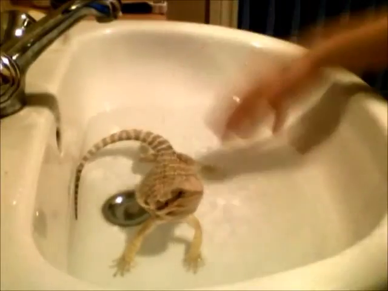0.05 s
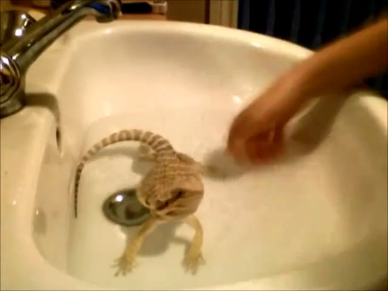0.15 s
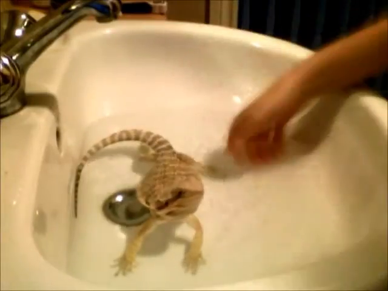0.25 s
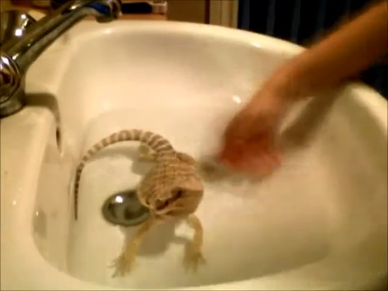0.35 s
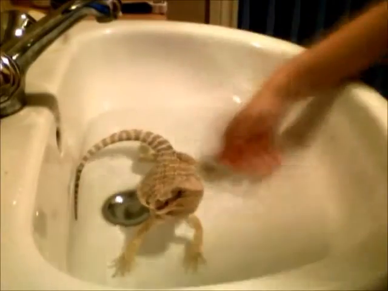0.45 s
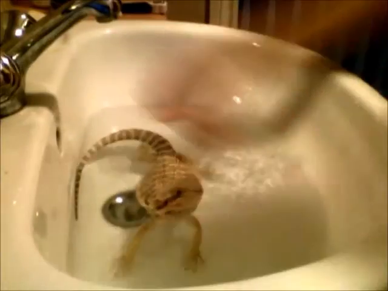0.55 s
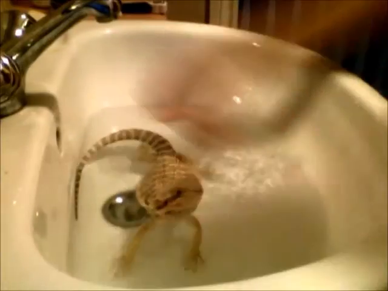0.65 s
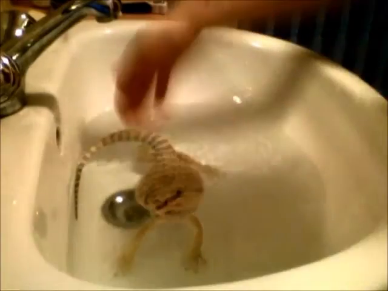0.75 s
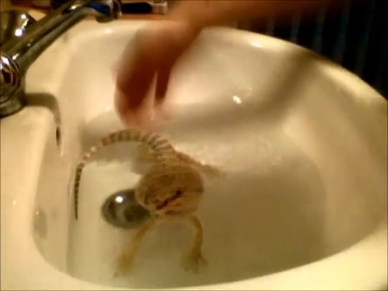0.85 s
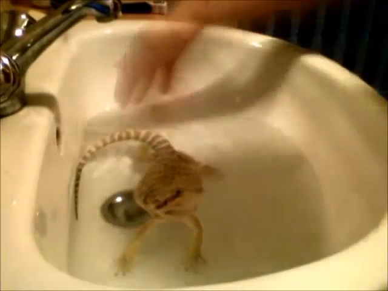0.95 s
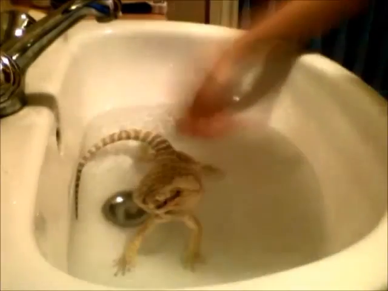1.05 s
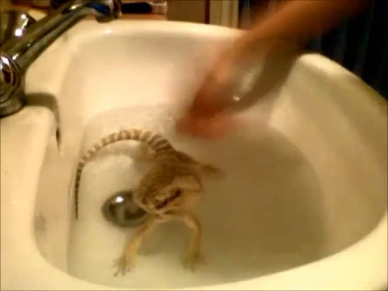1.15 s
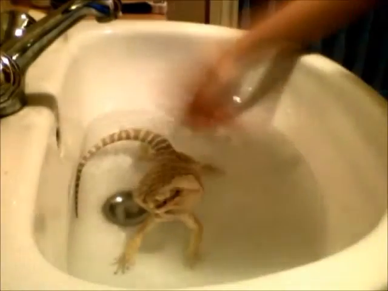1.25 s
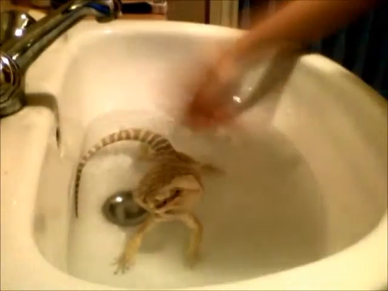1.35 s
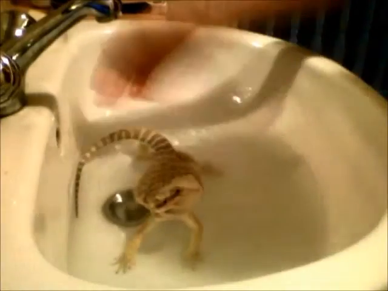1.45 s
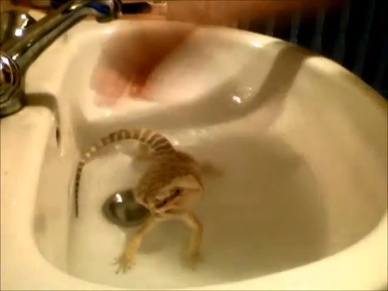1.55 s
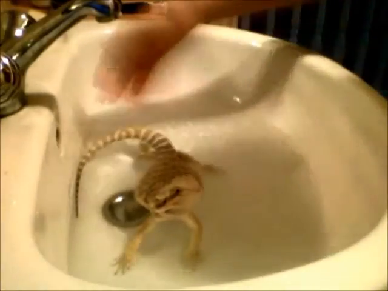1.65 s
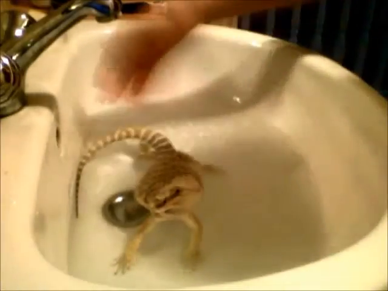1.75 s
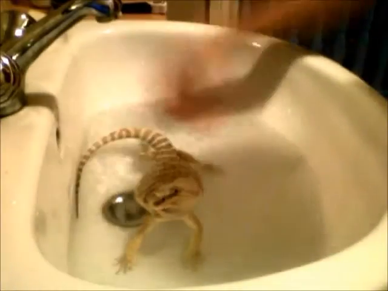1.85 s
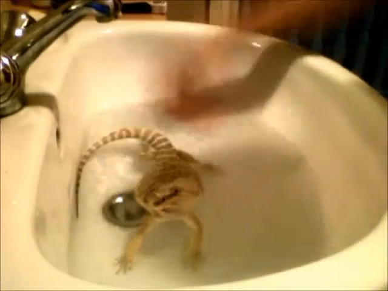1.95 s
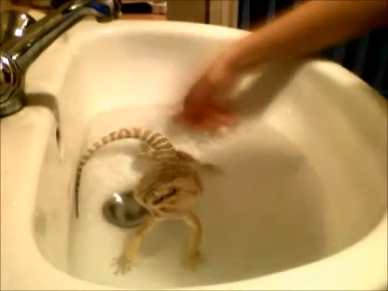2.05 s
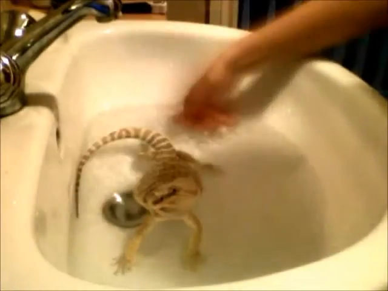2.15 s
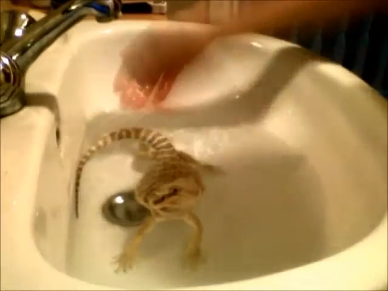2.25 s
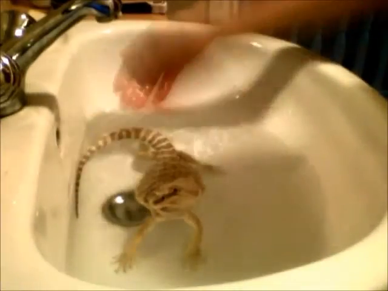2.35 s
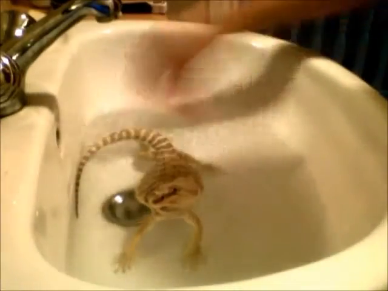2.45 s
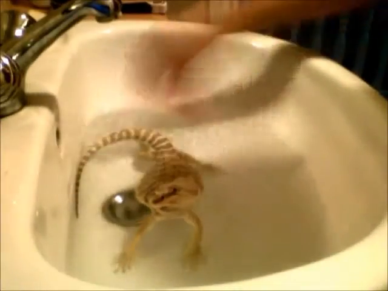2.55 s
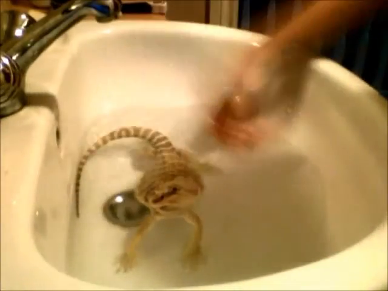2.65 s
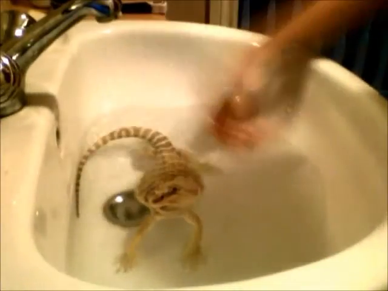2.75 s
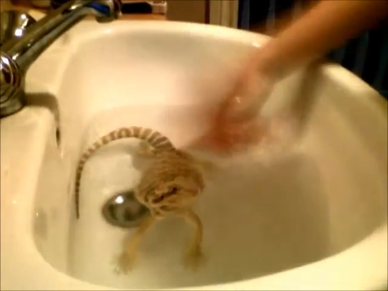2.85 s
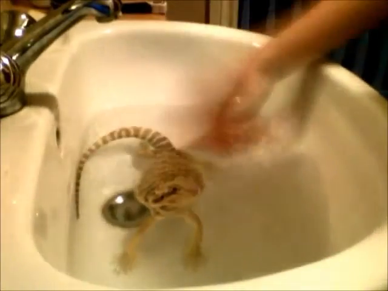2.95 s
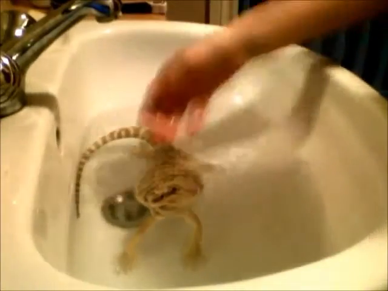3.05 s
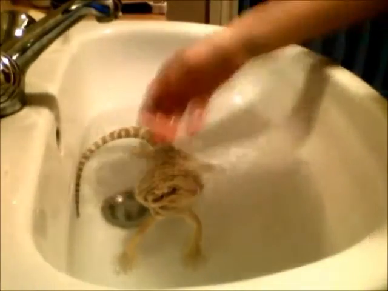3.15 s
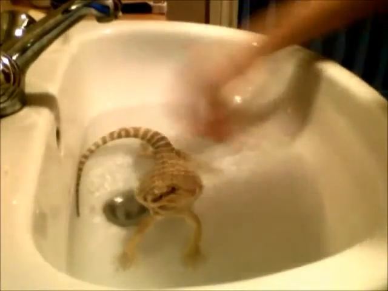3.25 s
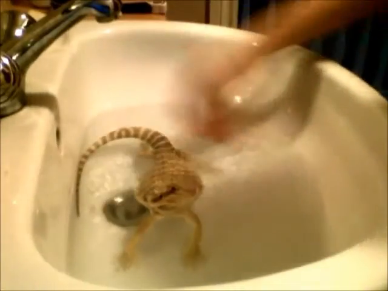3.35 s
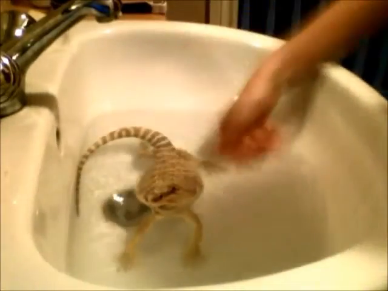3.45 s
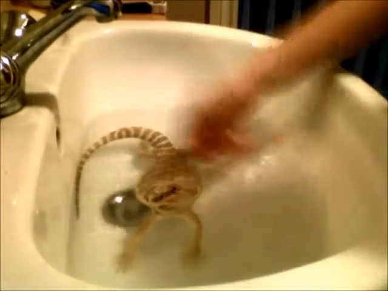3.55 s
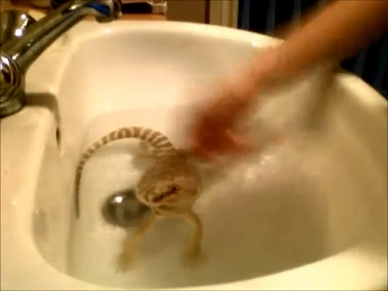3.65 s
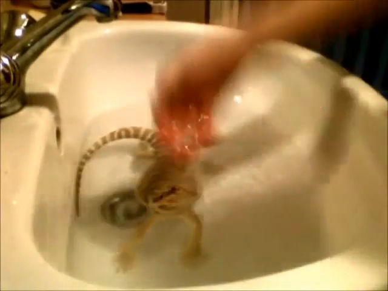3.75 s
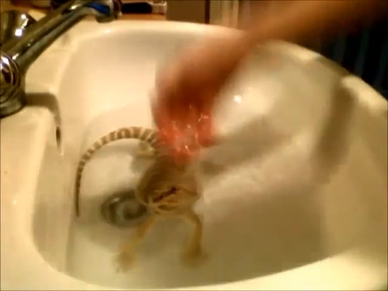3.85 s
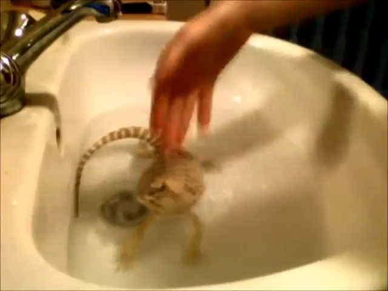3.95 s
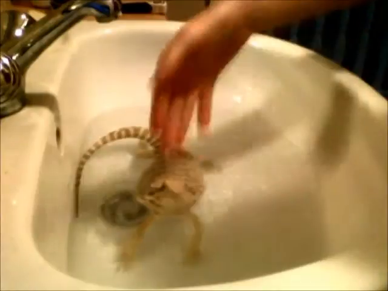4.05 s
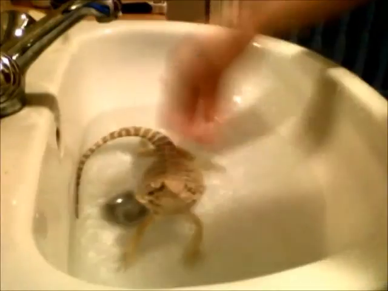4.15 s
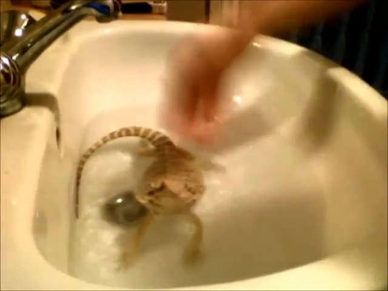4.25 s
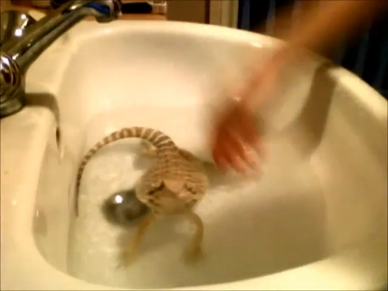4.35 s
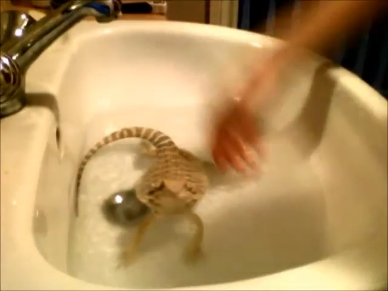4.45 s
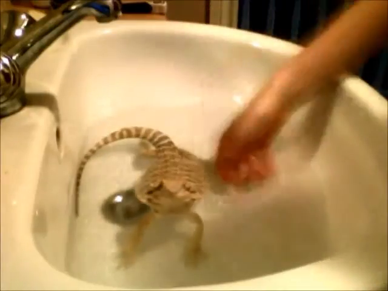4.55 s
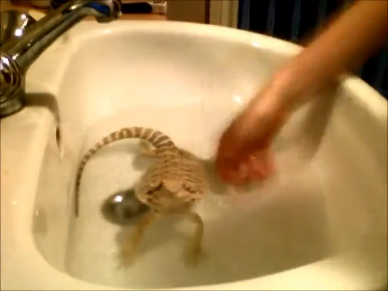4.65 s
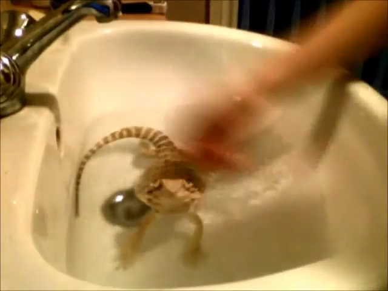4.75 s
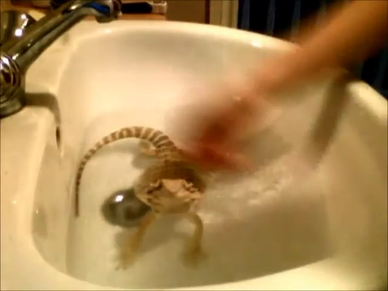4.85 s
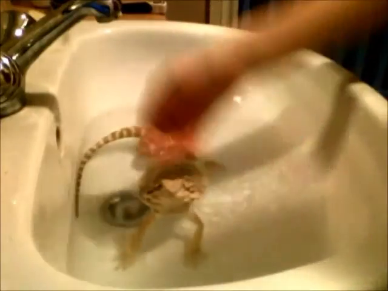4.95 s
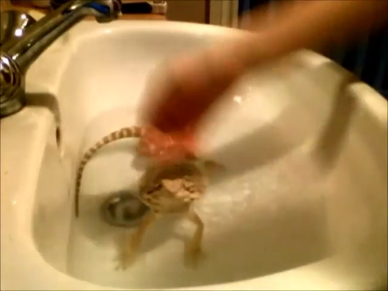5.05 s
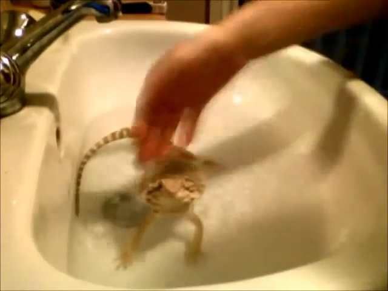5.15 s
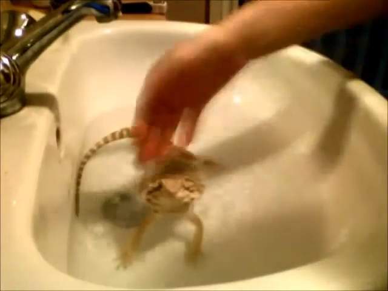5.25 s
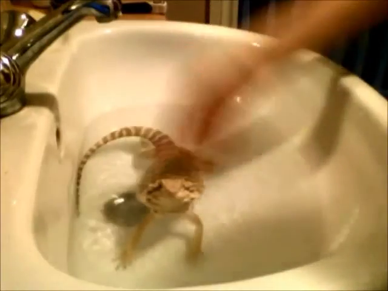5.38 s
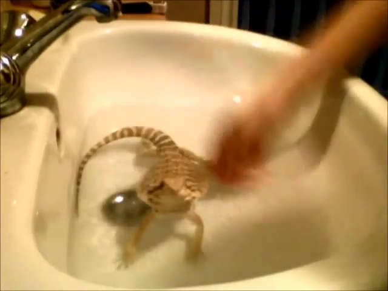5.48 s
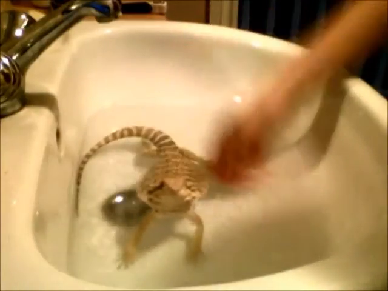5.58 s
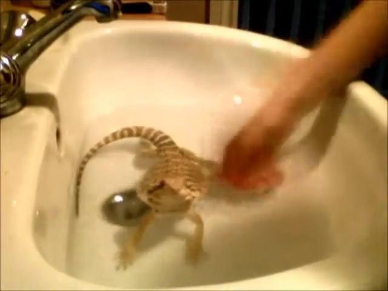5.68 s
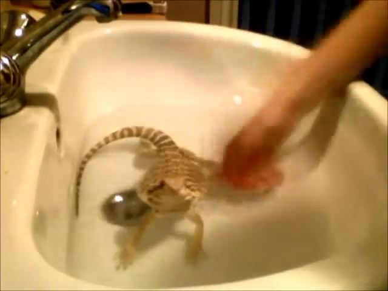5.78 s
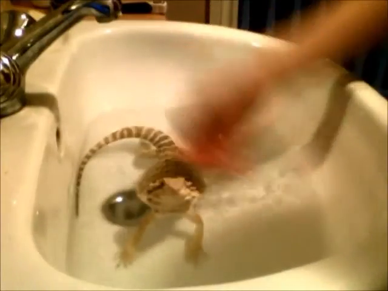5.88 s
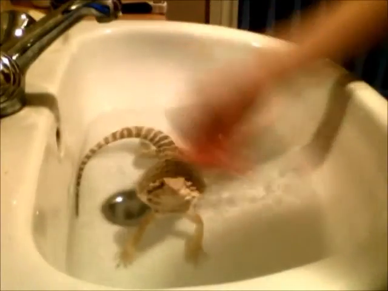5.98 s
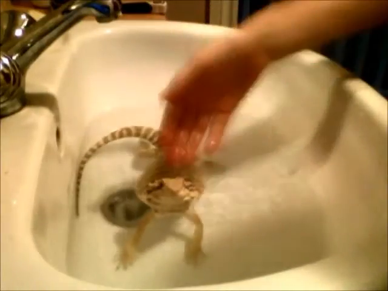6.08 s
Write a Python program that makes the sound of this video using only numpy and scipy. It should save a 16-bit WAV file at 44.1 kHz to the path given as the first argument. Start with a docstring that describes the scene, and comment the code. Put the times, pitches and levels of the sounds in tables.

```python
"""A tiled bathroom: a hand scoops water over a lizard in a shallow sink, heard by a small camera on the counter.
Single drops plink as pitched bubbles, and stirred water fizzes as clouds of bubbles; both ring in the room.
Bumps against the basin arrive through the counter as dull, rebounding thumps.
An extractor fan whirs with shaft-locked tones, motor hum and rushing air.
The microphone passes a narrow band and mirrors some of the treble above it."""
import sys
import numpy as np
from scipy import signal
from scipy.fft import rfft, irfft, next_fast_len
from scipy.io import wavfile
from scipy.ndimage import map_coordinates

SR = 44100
rng = np.random.default_rng(int(sys.argv[2]) if len(sys.argv) > 2 else 0)


def put_to_file(sound):
    """Save the sound as 16-bit audio at rate SR, in the file named by the first command-line argument."""
    columns = np.atleast_2d(sound).T  # one column per channel
    safe = np.clip(columns, -1, 1)
    whole_steps = np.round(safe * 32767)
    wavfile.write(sys.argv[1], SR, whole_steps.astype(np.int16))


N = 269892

# Fan tones before a common trim: [multiple of the shaft speed, rms level/dB]
FAN_TONES = [(1, -61.5), (3, -74), (4, -69), (5, -75), (6, -62), (7, -72.5), (8, -57), (12, -61),
             (14, -71.5), (16, -67.5), (17, -77), (18, -61), (20, -70), (22, -76.5), (24, -79.5), (26, -76)]
# Spectrum of the air through the fan: [f/Hz, relative density/dB]
AIR_SPECTRUM = [(12, -3.5), (25, -1), (45, -10), (100, -12), (200, -16), (350, -22.5), (800, -20.5),
                (1300, -22.5), (1800, -24.5), (2300, -30), (2700, -30.5), (3300, -40), (4000, -47),
                (5000, -65)]
# Slow drift of the fan's blade tone: [t/s, f/Hz]
BLADE_TONE = [(0.1, 799.4), (2.22, 795.6), (3.48, 802.6), (4.45, 804.4), (6.0, 795.5)]
BLADES = 12
# Likeness of left and right in the fan's air: [f/Hz, likeness 0 to 1]
STEREO_LIKENESS = [(1000, 1), (2000, 0.98), (4000, 0.93), (8000, .6)]

# Resonances of counter and camera stand: [f/Hz, relative level/dB, t60/s]
COUNTER_MODES = [(124.6, -7, 0.19), (141.7, 1, 0.2), (208.8, -15.5, 0.23), (275, -18, 0.21)]
# Spectrum of the cabinet's dense shudder: [f/Hz, relative density/dB]
SHUDDER_SPECTRUM = [(15, -7.5), (40, -3), (90, -1.5), (150, 0), (185, -18.5), (210, -5), (245, -16),
                    (277, -12), (310, -17), (400, -17.5), (600, -33.5), (1200, -46), (3000, -78.5)]
# Bumps on the basin: [t/s, ring level/dB, sway level/dB, sway f/Hz, wait to first rebound/s,
# ring loss per rebound/dB, sway loss per rebound/dB]
BUMPS = [(0.05, -14.5, -36, 34.9, .068, 16.5, 1), (0.811, -48, -42, 61, .04, 10.5, 10),
         (1.279, -33.5, -19, 22, 0.034, 2, 3.5), (1.861, -33, -31, 27.9, 0.054, 17, 19),
         (2.13, -54.5, -38.5, 27.2, 0.058, 10, 9), (2.68, -54, -44.5, 70, 0.054, 7.5, 4),
         (3.289, -51, -37, 22, 0.057, 10, 8), (3.684, -41, -20.5, 24, 0.028, 2.4, 6.5),
         (4.1856, -11, -14.5, 70.9, .022, 6, 1.5), (4.602, -22, -21.5, 51.4, .026, 4, -0.1),
         (5.098, -12.5, -17.5, 29, .038, 10, 9), (5.188, -26, -23, 24, .03, 9, 12),
         (5.672, -36, -12, 32, 0.048, 0, 4.5)]
# Factors from one rebound to the next
WAIT_GROWS, SWAY_SLOWS = 1.15, .9
# The hand leans on the basin before a bump: length, and level against the sway
LEAN_S, LEAN_DB = 0.025, -18.5
# The camera stand rocks on: pitch, its scatter, level against the sway, decay, build-up
STAND_HZ, STAND_OCTAVES, STAND_DB, STAND_T60_S, STAND_RISE_S = 28, .5, -12.5, 0.87, 0.099

# Single drops: [t/s, settled bubble f/Hz, nominal peak level/dB]
DROPS = [(0.335, 1910, -54.5), (0.559, 1650, -49), (1.2, 2080, -53), (2.07, 2590, -57), (2.745, 2620, -49),
         (3.8824, 1840, -29), (3.939, 2420, -51), (4.974, 2630, -54), (5.015, 1980, -47),
         (5.668, 2060, -45.5), (5.688, 2635, -47.5), (5.739, 2770, -49.5)]
# A louder drop starts further above its pitch: excess as a share at full scale, and its dB per dB of level
PITCH_EXCESS, EXCESS_SLOPE = 2.1, .52
# The hand sweeps through the water: [t/s, length/s, bubble f/Hz, spread/octaves, rms level/dB, spray rms level/dB]
SWEEPS = [(0.754, .078, 239, .26, -56.5, -66), (1.099, 0.065, 534, 0.59, -53.5, -54.5),
          (1.8, .09, 230, .25, -58, -62.5), (5.652, .135, 890, .29, -51, -59.5)]
# Spray pitch over the sweep's pitch; cycles a bubble rings (to -60 dB) in churned water
SPRAY_RATIO, SWEEP_CYCLES = 2.59, 10.5
# Water sloshing in the bowl shortly after a bump: [t/s, rms level/dB]
SLOSHES = [(4.27, -55), (5.17, -58), (5.72, -55.5)]
SLOSH_S, SLOSH_HZ, SLOSH_OCTAVES, SLOSH_CYCLES = .14, 812, 0.026, 40
# Dribbles from the fingers: [t/s, length/s, bubble f/Hz, rms level/dB]
DRIBBLES = [(0.13, .1, 1880, -64), (0.484, .05, 3400, -72.5), (0.687, 0.029, 2890, -61.5),
            (2.077, 0.083, 2450, -69), (2.313, .093, 2800, -68), (2.621, .14, 2040, -68),
            (2.735, .045, 2640, -63), (3.132, .055, 2180, -63.5), (5.009, .067, 2040, -66),
            (5.295, .1, 2750, -67.5)]
DRIBBLE_OCTAVES, DRIBBLE_CYCLES = .09, 28

# Reverberation of the tiled room: [f/Hz, t60/s]
ROOM_DECAY = [(200, 0.66), (2000, 0.37), (5000, 0.06)]
# The microphone's band edge: [f/Hz, gain/dB]
BAND_EDGE = [(3400, -1), (4000, -1.5), (4600, -10), (6000, -32.5)]
# What the microphone's smoothing lets through of the mirrored sound: [f/Hz, gain/dB]
MIRROR_GAIN = [(3400, -15.5), (4000, -5), (4600, -12), (5300, -35.5), (6100, -52.5), (7000, -54.5),
               (8000, -64), (9000, -69.5), (12000, -80.5)]
TOP_HZ = 15400


def amp(db):
    """Decibels to gain."""
    return 10 ** (np.asarray(db) / 20)


def unit(x):
    """Scale to rms 1."""
    return x / np.sqrt(np.mean(x ** 2) + 1e-20)


def along(points, hz):
    """Read a curve of (f/Hz, value) points on a log frequency axis."""
    f, value = np.transpose(points)
    return np.interp(np.log(hz + 1), np.log(f + 1), value)


def wobble(rate):
    """A smooth random curve with `rate` knots a second."""
    knots = rng.standard_normal(int(N * rate / SR) + 4)
    return map_coordinates(knots, [np.arange(N) * rate / SR])


def filtered(x, response):
    """Shape the spectrum of x by a gain that depends on frequency."""
    size = next_fast_len(N + SR // 2)
    gain = response(np.fft.rfftfreq(size, 1 / SR))
    return irfft(rfft(x, size) * gain, size)[..., :N]


def noise(spectrum):
    """Coloured noise of rms 1."""
    white = rng.standard_normal(N)
    return unit(filtered(white, lambda hz: amp(along(spectrum, hz))))


def add(track, s, sound):
    """Mix a sound into the track at time s."""
    start = max(round(s * SR), 0)
    track[start:start + len(sound)] += sound[:len(track) - start]


def ring(t, hz, t60, attack):
    """A struck resonance: a sine with a soft onset and an exponential decay."""
    return np.sin(2 * np.pi * hz * t) * amp(-60 * t / t60) * (1 - np.exp(-t / attack))


def in_room(x, wet_db):
    """Direct sound plus a diffuse answer of the tiles, a fresh one for every call."""
    hz, t, cells = signal.stft(rng.standard_normal(SR // 2), SR, nperseg=256)
    decay = amp(-60 * t / along(ROOM_DECAY, hz)[:, None])
    tail = signal.istft(cells * decay, SR, nperseg=256)[1]
    first_wall = SR // 200  # 5 ms: a path about 1.7 m longer than the direct one
    answer = np.pad(amp(wet_db) * tail / np.linalg.norm(tail), (first_wall, 0))
    answer[0] = 1
    return signal.fftconvolve(x, answer)


def fan(hum_hz=120, hum_db=-48.5, tones_db=1.0, flutter_db=1, air_db=-53):
    """Mains hum of the motor, tones locked to the drifting shaft, and rushing air."""
    t = np.arange(N) / SR
    hum = np.sqrt(2) * amp(hum_db + 0.53 * wobble(1.6)) * np.sin(2 * np.pi * hum_hz * t)
    shaft_hz = np.interp(t, *np.transpose(BLADE_TONE)) / BLADES
    shaft = 2 * np.pi * np.cumsum(shaft_hz) / SR
    tones = np.zeros(N)
    for k, db in FAN_TONES:
        # turbulence shakes the strength and phase of every tone
        strength = amp(db + tones_db + flutter_db * wobble(9))
        phase = k * shaft + 0.044 * wobble(6.6) + rng.uniform(0, 2 * np.pi)
        tones += strength * np.sin(phase)

    def side_gain(hz):
        likeness = np.clip(along(STEREO_LIKENESS, hz), 0, 1)
        return np.tan(np.arccos(likeness) / 2)

    side = filtered(noise(AIR_SPECTRUM), side_gain)
    air = amp(air_db) * (noise(AIR_SPECTRUM) + np.array([side, -side]))
    return hum + np.sqrt(2) * tones + air


def trickle(count=220, centre_hz=2150, spread=.3, level_db=-63, size_db=1.5, t60=0.034):
    """Water running off the fingers makes tiny plinks at random moments, the higher ones weaker."""
    t = np.arange(SR // 10) / SR
    out = np.zeros(N)
    times = rng.uniform(0, N / SR, count)
    draws = np.clip(rng.standard_normal((count, 2)), -2, 2)
    for s, (pitch, size) in zip(times, draws):
        hz = centre_hz * 2 ** (spread * pitch)  # spread in octaves
        level = amp(level_db + size_db * size - 2 * pitch)
        add(out, s, level * ring(t, hz, t60, attack=0.0014))
    return in_room(out, wet_db=3)[:N]


def leaning():
    """A soft swell of pressure leads into each bump, and the stand rocks on after it."""
    out = np.zeros(N)
    t = np.arange(SR) / SR
    swell = np.hanning(round(LEAN_S * SR))
    scatters = rng.uniform(-1.1, 1, len(BUMPS))
    for (s, _, sway_db, *_), scatter in zip(BUMPS, scatters):
        rock_hz = STAND_HZ * 2 ** (STAND_OCTAVES * scatter)
        rocking = ring(t, rock_hz, STAND_T60_S, attack=STAND_RISE_S)
        add(out, s - LEAN_S, amp(sway_db + LEAN_DB) * swell)
        add(out, s, amp(sway_db + STAND_DB) * rocking)
    return out


def contacts(count=4):
    """Each bump and its rebounds, rocking ever slower: rows of (t/s, ring/dB, sway/dB, sway f/Hz)."""
    rows = []
    for s, ring_db, sway_db, sway_hz, wait, ring_loss, sway_loss in BUMPS:
        for k in range(count):
            rows.append((s, ring_db - k * ring_loss, sway_db - k * sway_loss, sway_hz * SWAY_SLOWS ** k))
            s = s + wait * WAIT_GROWS ** k
    return rows


def thumps(sway_t60=0.16, shudder_db=-16, sway_share=0.91):
    """Each contact rings the counter, rocks the camera and leaves the cabinet shuddering."""
    t = np.arange(SR // 2) / SR
    body, shake_power = np.zeros(N), np.zeros(N)
    knock = sum(amp(db) * ring(t, hz, t60, attack=0.0065) for hz, db, t60 in COUNTER_MODES)
    fade = amp(-60 * t / .26) * (1 - np.exp(-t / .003))  # t60 and onset of the shudder, s
    for s, ring_db, sway_db, sway_hz in contacts():
        sway = np.sqrt(2) * ring(t, sway_hz, sway_t60, attack=0.0025)
        add(body, s, amp(ring_db) * knock - amp(sway_db) * sway)
        force = .5 * amp(ring_db) + sway_share * amp(sway_db)
        add(shake_power, s, (force * fade) ** 2)  # overlapping shudders add in power
    return body + amp(shudder_db) * np.sqrt(shake_power) * noise(SHUDDER_SPECTRUM)


def clouds():
    """Sweeps, spray, sloshes, dribbles: rows of (t/s, length/s, f/Hz, spread/octaves, cycles, rms level/dB)."""
    rows = []
    for s, length, hz, spread, db, spray_db in SWEEPS:
        rows.append((s, length, hz, spread, SWEEP_CYCLES, db))
        rows.append((s, length, hz * SPRAY_RATIO, spread, SWEEP_CYCLES, spray_db))
    for s, db in SLOSHES:
        rows.append((s, SLOSH_S, SLOSH_HZ, SLOSH_OCTAVES, SLOSH_CYCLES, db))
    for s, length, hz, db in DRIBBLES:
        rows.append((s, length, hz, DRIBBLE_OCTAVES, DRIBBLE_CYCLES, db))
    return rows


def splashes(count=260, size_db=2.5, wet_db=-4):
    """Stirred water is a cloud of little ringing bubbles, born a little more densely early on."""
    t = np.arange(SR // 10) / SR
    out = np.zeros(N)
    for s, length, hz, spread, cycles, db in clouds():
        cloud = np.zeros(SR // 2)
        births = rng.beta(1.5, 2, count) * length
        for birth, (pitch, size) in zip(births, rng.standard_normal((count, 2))):
            octaves = spread * 2 * np.tanh(pitch / 2)  # keeps stray pitches in bounds
            bubble_hz = hz * 2 ** octaves
            bubble = ring(t, bubble_hz, cycles / bubble_hz, attack=2 / bubble_hz)
            add(cloud, birth, amp(size_db * size) * bubble)
        cloud = in_room(cloud, wet_db)
        # the whole energy, echo included, equals the rms level held for the length
        to_rms = np.sqrt(length * SR / np.sum(cloud ** 2))
        add(out, s, amp(db) * cloud * to_rms)
    return out


def drops(t60=0.038, settle=0.001, wet_db=-1.5):
    """A drop traps a bubble whose pitch falls to its settled value as it rings."""
    t = np.arange(SR // 8) / SR
    out = np.zeros(N)
    for s, hz, db in DROPS:
        excess = PITCH_EXCESS * amp(EXCESS_SLOPE * db)
        phase = 2 * np.pi * hz * (t + excess * settle * (1 - np.exp(-t / settle)))
        onset = (1 - np.exp(-t * hz)) ** 2
        plink = np.sin(phase) * amp(db - 60 * t / t60) * onset
        add(out, s, in_room(plink, wet_db))
    return out


def scene():
    """Water, fan and thumps, the right channel a touch louder than the left, a little more so for the thumps."""
    airborne = fan() + drops() + splashes() + trickle()
    through_counter = thumps() + leaning()
    # left and right gains in dB
    return airborne * amp([[-.14], [.14]]) + through_counter * amp([[-.26], [.26]])


def record(dry, clock_hz=3900, clock_db=-53, hiss_db=-99):
    """Coarse sampling mirrors treble upward, and the microphone's clock adds faint sidebands to the sound."""
    t = np.arange(N) / SR
    sampling = 2 * np.cos(2 * np.pi * 8000 * t)  # mirrors about 4 kHz
    narrow = filtered(dry, lambda hz: amp(along(BAND_EDGE, hz)))
    mirrored = filtered(narrow * sampling, lambda hz: amp(along(MIRROR_GAIN, hz)))
    sidebands = amp(clock_db) * narrow * np.cos(2 * np.pi * clock_hz * t)
    hiss = amp(hiss_db) * rng.standard_normal((2, N))
    return filtered(narrow + mirrored + sidebands + hiss, lambda hz: hz < TOP_HZ)


dry = scene()
out = record(dry)
put_to_file(out)
```